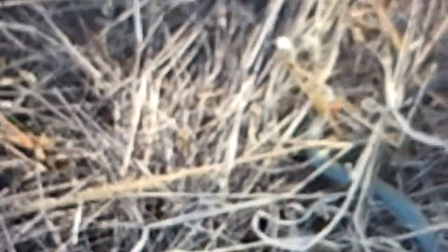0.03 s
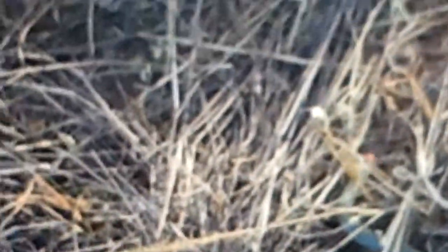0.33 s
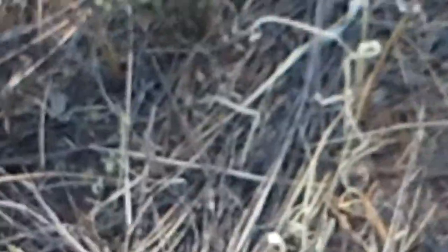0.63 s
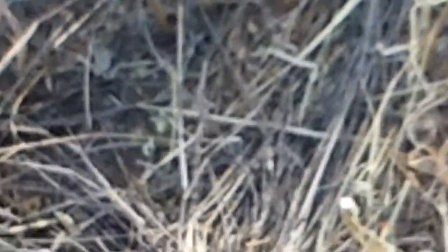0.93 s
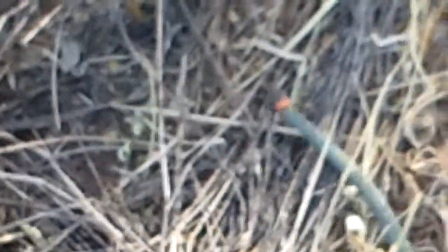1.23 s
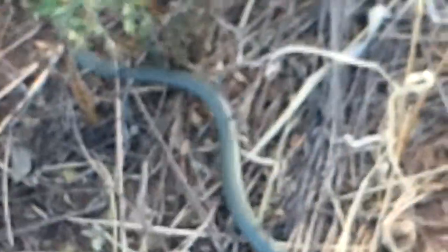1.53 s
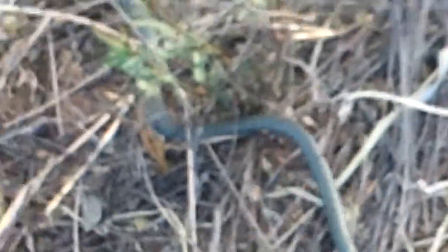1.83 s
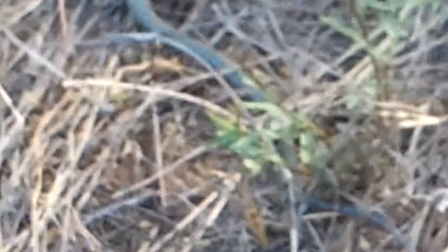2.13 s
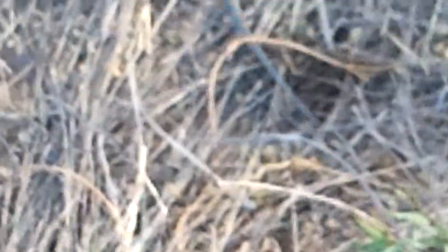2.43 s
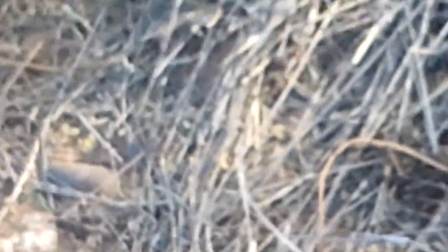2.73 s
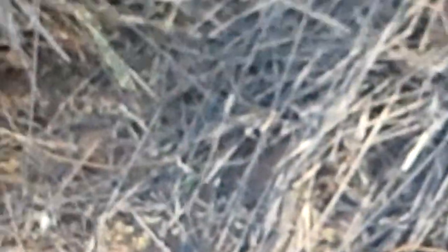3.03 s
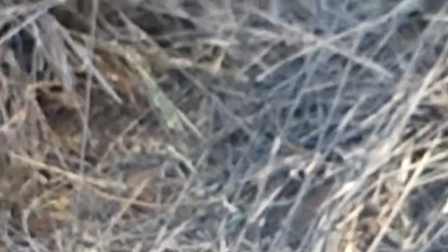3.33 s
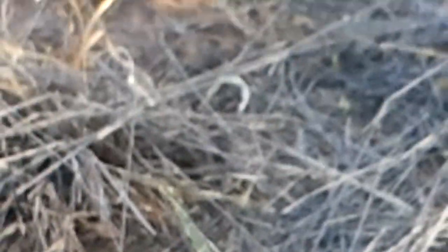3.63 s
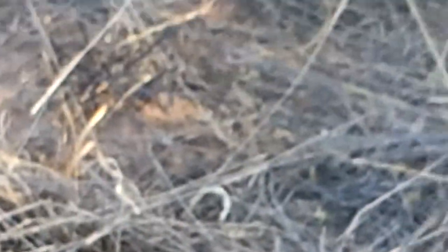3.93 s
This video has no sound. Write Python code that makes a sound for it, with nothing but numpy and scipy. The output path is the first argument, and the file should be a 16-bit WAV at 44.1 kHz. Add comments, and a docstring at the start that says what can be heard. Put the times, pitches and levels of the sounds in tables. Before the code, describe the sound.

A snake rustles and crackles through dry grass while birds call faintly far off.

```python
"""In a yard, a snake slides through dry grass, close to a small microphone.
Its body hisses and crackles against the blades while stalks snap and brittle blades crunch.
Later only a few twigs tick, among some soft bumps. Birds call far off, with an echo,
and an insect pulses faintly in the quiet outdoor air."""
import sys
import numpy as np
from scipy import signal
from scipy.io import wavfile
from scipy.ndimage import uniform_filter1d

SR = 44100
rng = np.random.default_rng(int(sys.argv[2]) if len(sys.argv) > 2 else 0)


def generate_wav(sig):
    """Save sig (samples, or channels by samples) to the path in sys.argv[1] as 16-bit PCM at SR."""
    pcm = np.round(np.clip(np.atleast_2d(sig).T, -1, 1) * 32767).astype(np.int16)
    wavfile.write(sys.argv[1], SR, pcm)


N = 176400
TIME = np.arange(N) / SR


def amp(db):
    """Turns decibels into a number to multiply by."""
    return 10 ** (np.asarray(db) / 20)


def unit(x):
    """Scales a signal to an average power of 1."""
    return x / np.sqrt(np.mean(x ** 2) + 1e-20)


def add(mix, start_s, sound):
    """Mixes a sound in at the given time."""
    part = mix[max(round(start_s * SR), 0):][:len(sound)]
    part += sound[:len(part)]


def level(points):
    """A volume curve through (t/s, level/dB) points."""
    return amp(np.interp(TIME, *np.transpose(points)))


def colour(x, points, size=4096):
    """Shapes the tone along (f/Hz, level/dB) points; white noise keeps its power."""
    hz, db = np.transpose(points)
    bin_hz = abs(np.fft.fftfreq(size, 1 / SR))
    gain = amp(np.interp(np.log(bin_hz + 1), np.log(hz), db))
    spectrum = np.exp(np.conj(signal.hilbert(np.log(gain))))  # rings after a click, never before
    taps = np.fft.ifft(spectrum).real[:size // 2]
    return signal.fftconvolve(x, taps / np.linalg.norm(taps))[:len(x)]


def wobble(length, size):
    """A smooth random wiggle; a bigger size makes it slower."""
    return unit(uniform_filter1d(uniform_filter1d(rng.standard_normal(length), size), size))


def echo(x, decay_s):
    """Many small reflections blur into a fading tail."""
    t = TIME[:int(8 * decay_s * SR) + 2]
    taps = rng.standard_normal(SR)[:len(t)]
    fade = np.exp(-t / decay_s) * (1 - np.exp(-2 * t / decay_s))
    taps *= fade[:len(taps)]
    return signal.fftconvolve(x, taps / np.linalg.norm(taps))[:len(x)]


def ring(hz, peak_ms, size=3000):
    """A vibration that swells and dies within a few cycles."""
    t = TIME[:size]
    age = t * 1000 / peak_ms
    return age * np.exp(1 - age) * np.sin(2 * np.pi * hz * t)


def grains(per_s, spread_db):
    """Tiny random taps, a few much stronger than the rest."""
    strength = amp(spread_db * np.minimum(rng.exponential(1, N), 5))
    return unit(strength * rng.choice([-1, 1], N) * (rng.random(N) < per_s / SR))


# Tone of scales sliding on blades, stalks rustling and ground litter scuffing: f/Hz, level/dB
HISS_TONE = [(300, -25), (1500, -7), (3300, -9.5), (4500, -3.5), (5500, -2.5), (6600, -7), (7400, -15.5),
             (8000, -28), (8800, -32.5)]
RUSTLE_TONE = [(200, -10), (500, -8), (900, 0.5), (1500, -0.5), (2400, -4.5), (3300, -9.5), (6000, -17.5),
               (8500, -42)]
SCUFF_TONE = [(30, 2.5), (100, -1), (220, -1.5), (500, -8.5), (1000, -16), (3000, -17), (8000, -47.5)]
# How the same three sounds swell and fade: t/s, level/dB
HISS_LEVEL = [(0, -68), (.25, -63.5), (.4, -58), (.5, -55.5), (.64, -51), (.78, -53), (.88, -56.5),
              (1.0, -61.5), (1.12, -58.5), (1.2, -52), (1.29, -49.5), (1.4, -61), (1.48, -56), (1.54, -62),
              (1.63, -56.5), (1.72, -64.5), (2.2, -68), (3.4, -69.5), (3.7, -65.5), (4, -68.5)]
RUSTLE_LEVEL = [(0, -70.5), (.3, -63), (.7, -56), (.82, -49.5), (.97, -59), (1.09, -55.5), (1.155, -49),
                (1.22, -56), (1.35, -57), (1.48, -55), (1.64, -59.5), (1.8, -63), (2.2, -92), (2.9, -80.5),
                (3.2, -69.5), (3.48, -70.5), (3.65, -65), (4, -65.5)]
SCUFF_LEVEL = [(0, -60.5), (.4, -58), (.65, -53.5), (.82, -50), (.98, -61), (1.3, -66), (1.8, -72),
               (4, -78.5)]


def slither():
    """The snake's body brushes blades, stirs stalks and drags over the litter on the ground."""
    flicker = wobble(N, size=400)  # hiss and rustle waver together
    hiss = colour(grains(per_s=3500, spread_db=1.5), HISS_TONE) * level(HISS_LEVEL)
    rustle = colour(grains(per_s=1500, spread_db=3.5), RUSTLE_TONE) * level(RUSTLE_LEVEL)
    scuff = colour(rng.standard_normal(N), SCUFF_TONE) * level(SCUFF_LEVEL)
    return hiss * amp(1.8 * flicker) + rustle * amp(1.9 * flicker) + scuff


# Stalks snapping: t/s, tick level/dB, tick f/Hz, tick rise/ms, crack level/dB, crack f/Hz
STALK_SNAPS = [(0.4053, -35.5, 1500, 0.19, -21, 6900), (.821, -29, 1200, 0.25, -47, 5100),
               (.827, -35, 1300, 0.17, -44, 5200), (0.8512, -40, 1200, 0.25, -36, 5500),
               (0.897, -40, 1500, 0.17, -46, 5000), (0.8994, -33, 1410, 0.19, -43, 4700),
               (.9121, -33.5, 785, 0.15, -50, 4700), (1.009, -41.5, 1600, .3, -48, 4500),
               (1.0531, -28, 1160, 0.35, -37, 5900), (1.07, -36, 1270, .3, -41, 6100),
               (1.078, -30.5, 1070, 0.22, -43, 4700), (1.1219, -45, 1500, 0.32, -41, 5600),
               (1.1588, -33.5, 1380, 0.24, -39.5, 5200), (1.1753, -23.5, 1405, 0.48, -36, 5200),
               (1.2378, -30, 1420, 0.54, -41, 5300), (1.2618, -19.5, 1610, .14, -26, 4850),
               (1.29, -31.5, 1500, 0.13, -38.5, 4500), (1.3047, -31, 2180, 0.089, -45, 5250),
               (1.3536, -32, 1530, 0.34, -48, 5000), (1.4057, -39, 1090, 0.47, -49, 5000),
               (1.432, -33.5, 1710, .18, -45, 4800), (1.4422, -30, 1600, 0.42, -42, 5100),
               (1.4754, -34.5, 1900, .19, -33, 5500), (1.48, -29.5, 1710, 0.07, -39, 5500),
               (1.492, -35, 2070, .36, -38.5, 5200), (1.5203, -37, 1570, 0.55, -48, 4700),
               (1.5552, -30.5, 1660, .16, -46, 5300), (1.5615, -33.5, 1510, 0.33, -48, 5100),
               (1.5666, -29.5, 2120, .15, -38.5, 5700), (1.591, -27, 1620, 0.095, -43, 5200),
               (1.5923, -24.5, 1700, 0.37, -38.5, 5200), (1.5953, -28.5, 2300, 0.12, -37.5, 5300),
               (1.6174, -23.5, 1750, 0.21, -47, 5000), (1.6217, -31, 2340, 0.18, -35, 5300),
               (1.6428, -24.5, 1640, 0.22, -41.5, 5300), (1.6991, -36, 1470, .15, -65, 4000),
               (1.7084, -37.5, 2050, 0.39, -35.5, 4250), (1.762, -39, 1510, 0.19, -62, 4600),
               (1.7821, -29.5, 2220, 0.17, -37.5, 6000), (1.7919, -24, 2430, 0.12, -35.5, 5300),
               (3.145, -39.5, 2300, 0.24, -49.5, 6200), (3.2464, -36, 2020, 0.15, -56, 3800),
               (3.256, -29, 2000, 0.12, -57, 3700), (3.441, -48.5, 1940, .18, -62, 3800),
               (3.5203, -27.5, 2180, 0.13, -38.5, 5530), (3.5305, -43, 2700, .12, -44, 5800),
               (3.7986, -29, 2170, 0.15, -39, 5970), (3.852, -38, 1710, 0.094, -67, 4000)]
# Tone laid over all the snaps: f/Hz, level/dB
SNAP_TONE = [(200, -10), (450, -7.5), (750, 1), (1100, 2), (1600, 0), (2400, 2.5), (3300, 0.5), (4600, 3.5),
             (6000, 2), (7300, -3), (8200, -13), (9000, -21.5)]


def snaps():
    """Each stalk gives a woody tick and a bright crack, which bounce around in the litter."""
    out = np.zeros(N)
    for start_s, tick_db, tick_hz, rise_ms, crack_db, crack_hz in STALK_SNAPS:
        tick = ring(tick_hz, rise_ms) + amp(-21.5) * ring(tick_hz, peak_ms=0.39)
        snap = amp(tick_db) * tick + amp(crack_db) * ring(crack_hz, peak_ms=0.19)
        scatter = amp(-8.5) * echo(snap, decay_s=0.00157)
        linger = amp(-18.5) * echo(snap, decay_s=0.0066)
        add(out, start_s, snap + scatter + linger)
    return colour(out, SNAP_TONE)


# Brittle blades breaking: t/s, level/dB, fade time/ms
BLADE_BREAKS = [(.346, -44.5, 3), (0.4062, -25, 2.3), (0.4103, -36, 12.6), (.47, -44, 6.4),
                (.4845, -30, 2.3), (.489, -48, 29), (0.509, -40, 2), (0.5836, -34.5, 2.1),
                (0.6267, -35.5, 1.3), (0.6383, -42, 5.4), (0.7326, -31, 1.3), (0.7689, -36.5, 1.5),
                (.776, -36.5, 1.4), (.793, -48, 1.4), (1.172, -33.5, .99), (1.19, -37.5, 6.7),
                (1.2042, -40, 2.8), (1.211, -49, 4), (1.472, -41, 3.4), (1.484, -41, 2.8)]
# Tone of the crunch: f/Hz, level/dB
CRUNCH_TONE = [(200, -7), (800, -7), (1500, 6), (2400, 1), (3400, -9), (4300, 4.5), (6800, 2),
               (7700, -11.5), (8800, -25.5)]


def crunches():
    """Many fibres of a dry blade break at once, in a short burst of noise."""
    force = np.zeros(N)
    for start_s, db, fade_ms in BLADE_BREAKS:
        add(force, start_s, amp(db) * np.exp(-TIME[:4000] * 1000 / fade_ms))
    return colour(force * rng.standard_normal(N), CRUNCH_TONE)


# Soft bumps: t/s, level/dB, upper f/Hz
SOFT_BUMPS = [(2.008, -52.5, 400), (2.634, -48, 185), (3.057, -52, 235), (3.421, -53, 200),
              (3.763, -65, 180)]


def bumps(rise_s=0.0065):
    """Short, dull knocks close by, each a puff of low noise."""
    out = np.zeros(N)
    age = TIME[:SR // 10] / rise_s
    for start_s, db, top_hz in SOFT_BUMPS:
        low_band = signal.butter(2, [70, top_hz], "band", fs=SR, output="sos")
        thud = unit(signal.sosfilt(low_band, rng.standard_normal(len(age))))
        add(out, start_s, amp(db) * age * np.exp(1 - age) * thud)
    return out


# Far bird wails, one list of points per call: t/s, f/Hz, note level/dB, octave level/dB
WAIL_CURVES = [
    [(0, 978, -72.5, -64.5), (.07, 937, -63.5, -68), (.13, 907, -78, -69), (.2, 823, -95, -78)],
    [(1.74, 726, -92, -60), (1.8, 887, -66.5, -54), (1.86, 921, -66, -55), (1.92, 921, -64.5, -59),
     (2.026, 839, -81, -54.5), (2.11, 749, -86, -67), (2.14, 710, -88, -93)],
    [(2.86, 641, -81, -76), (2.93, 704, -90, -70.5), (2.98, 786, -76, -65), (3.025, 987, -59, -57),
     (3.09, 1016, -57, -65.5), (3.17, 992, -61.5, -59.5), (3.215, 906, -62.5, -56.5),
     (3.27, 876, -69.5, -61.5), (3.33, 830, -83, -76)],
    [(3.19, 940, -93, -60), (3.225, 977, -80, -60), (3.29, 1017, -92, -59.5), (3.37, 991, -86, -57),
     (3.41, 914, -88, -62), (3.47, 870, -87, -69), (3.5, 858, -91, -82)],
    [(3.53, 1189, -67, -72), (3.6, 1259, -71, -92), (3.8, 1197, -69, -71)],
]


def bird_wails():
    """A bird's note bends in pitch, with a strong second tone an octave above it."""
    out = np.zeros(N)
    for call in WAIL_CURVES:
        times, *columns = np.transpose(call)
        t = np.arange(times[0], times[-1], 1 / SR)
        hz, note_db, octave_db = (np.interp(t, times, column) for column in columns)
        hz *= 1 + 0.0052 * wobble(len(t), size=150)
        phase = 2 * np.pi * np.cumsum(hz) / SR
        octave_db += 1.5 * wobble(len(t), size=700)
        tone = amp(note_db) * np.sin(phase) + amp(octave_db) * np.sin(2 * phase)
        rasp = 1 + 0.098 * wobble(len(t), size=100)
        add(out, times[0], np.sqrt(2) * tone * rasp * signal.windows.tukey(len(t), 0.06))
    return out


# Small birds' chirps: t/s, length/s, start f/Hz, end f/Hz, level/dB, roughness (0 is pure)
CHIRP_NOTES = [(1.731, 0.041, 4400, 3800, -63, 0.2), (1.852, 0.13, 3880, 3500, -66, 0.82),
               (2.023, 0.1, 3750, 4410, -62.5, 0.33), (2.062, 0.086, 4000, 4280, -67, 0.74),
               (2.245, 0.047, 4200, 4000, -61, 0.23), (2.253, 0.023, 3450, 3500, -59.5, 0.14),
               (2.88, 0.13, 3820, 3790, -70, 0.26), (3.185, 0.047, 3800, 3080, -64.5, 0.9),
               (3.26, 0.031, 4240, 3190, -60.5, 0.5), (3.246, 0.03, 4320, 3670, -59, 0.27),
               (3.252, 0.032, 3500, 2670, -60, 0.7), (3.395, .11, 4130, 4000, -73.5, 0),
               (3.6, 0.17, 3210, 4040, -69, 1.07)]


def bird_chirps():
    """Thin, sliding whistles, made rough by a quick shake in pitch and loudness."""
    out = np.zeros(N)
    for start_s, length_s, start_hz, end_hz, db, rough in CHIRP_NOTES:
        progress = np.linspace(0, 1, int(length_s * SR))
        hz = start_hz + (end_hz - start_hz) * progress
        hz *= 1 + rough * 0.055 * wobble(len(hz), size=60)
        rasp = 1 + rough * wobble(len(hz), size=50)
        tone = np.sqrt(2) * np.sin(2 * np.pi * np.cumsum(hz) / SR)
        add(out, start_s, amp(db) * np.sin(np.pi * progress) * rasp * tone)
    return out + 0


# Tone of a far insect's buzz: f/Hz, level/dB
INSECT_TONE = [(2500, -36), (3700, -4), (4500, 5), (5500, -1), (6500, -1.5), (7200, -7), (7900, -23.5),
               (9000, -38.5)]


def insect(period_s=0.0744, peak_s=2.691):
    """An insect buzzes in soft, noisy strokes that repeat evenly."""
    strokes = np.cos(np.pi * (TIME - peak_s) / period_s) ** 2
    return amp(-67.5) * strokes * colour(rng.standard_normal(N), INSECT_TONE)


# Tone of the outdoor air: f/Hz, level/dB
AIR_TONE = [(20, -0.5), (60, 2.5), (110, -0.5), (200, -8), (450, -13.5), (1000, -17), (2000, -24),
            (3200, -23), (4500, -26.5), (6500, -33.5), (7300, -35.5), (7900, -46), (9000, -61.5)]


def air():
    """Quiet outdoor rumble and hiss, slightly uneven."""
    return amp(-58 + 0.38 * wobble(N, size=1500)) * colour(rng.standard_normal(N), AIR_TONE)


def scene():
    """The snake in the grass, the birds echoed by the yard, the insect and the air, in one channel."""
    close_sounds = snaps() + crunches() + slither() + bumps()
    birds = bird_wails() + bird_chirps()
    yard_echo = amp(-14) * echo(birds, decay_s=0.13)
    return (close_sounds + birds + yard_echo + insect() + air())[None]


def record(dry, top_hz=8800, offset=-0.069):
    """The recorder cuts off the highest treble and shifts the whole wave slightly below zero."""
    treble_cut = signal.firwin(301, top_hz, window=("kaiser", 9), fs=SR)
    return signal.oaconvolve(dry, treble_cut[None], "same") + offset


dry = scene()
out = record(dry)
generate_wav(out)
```